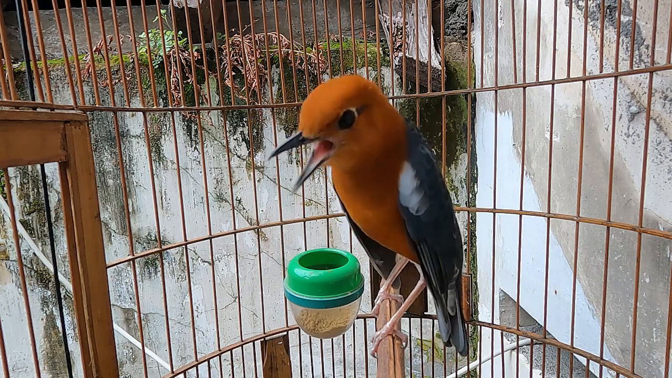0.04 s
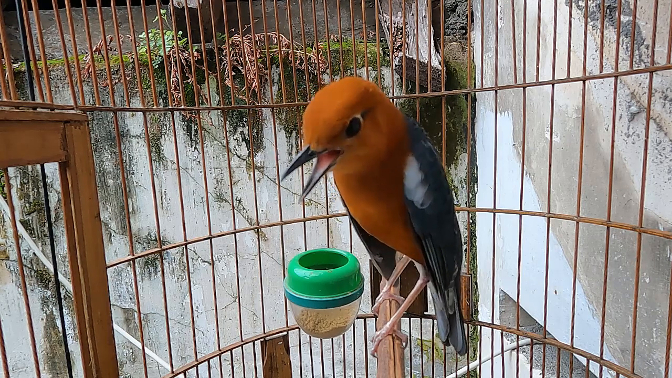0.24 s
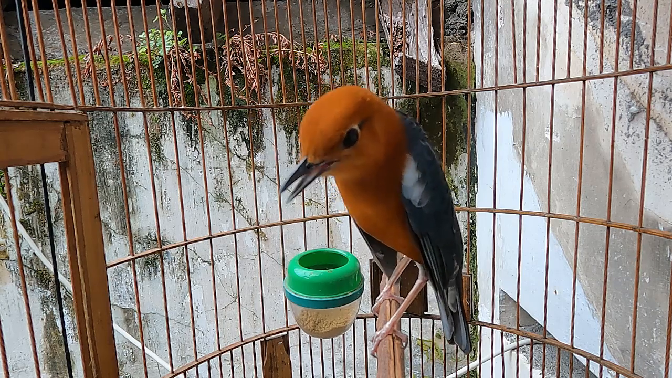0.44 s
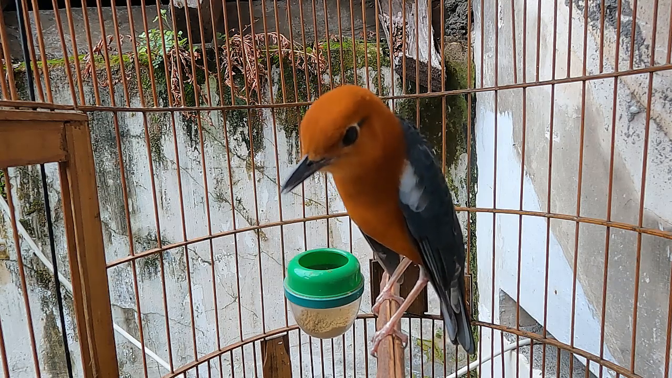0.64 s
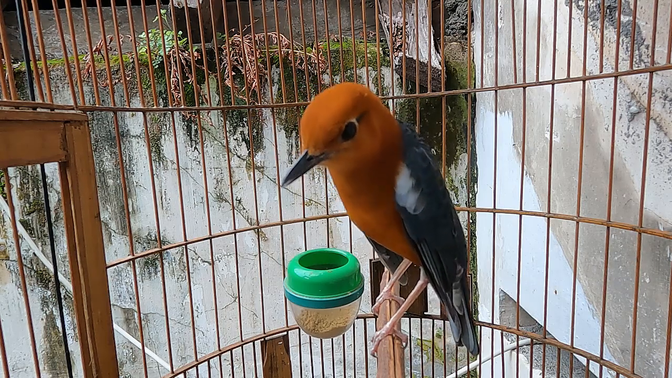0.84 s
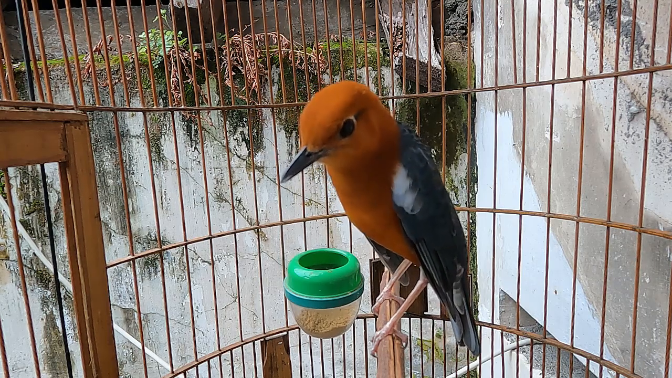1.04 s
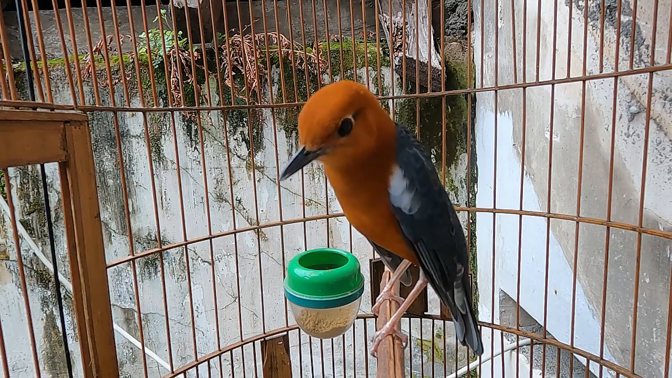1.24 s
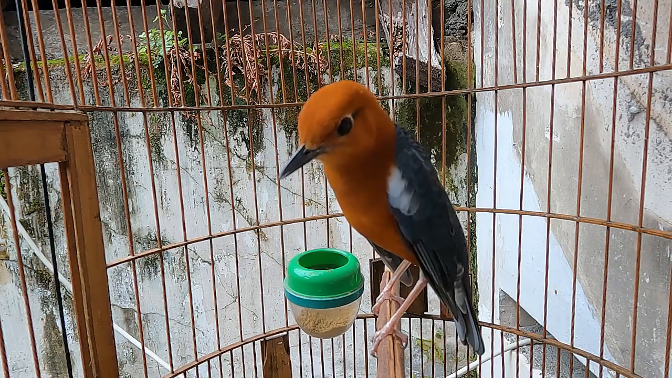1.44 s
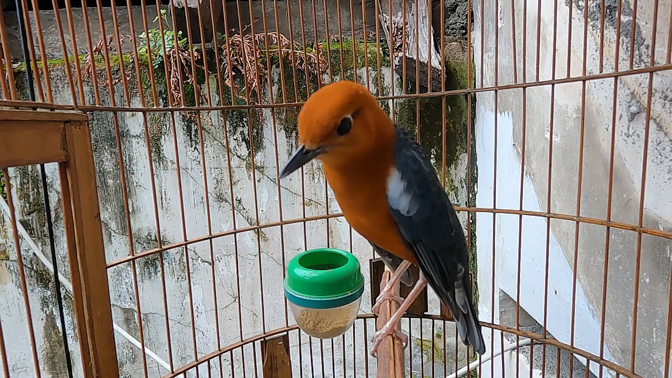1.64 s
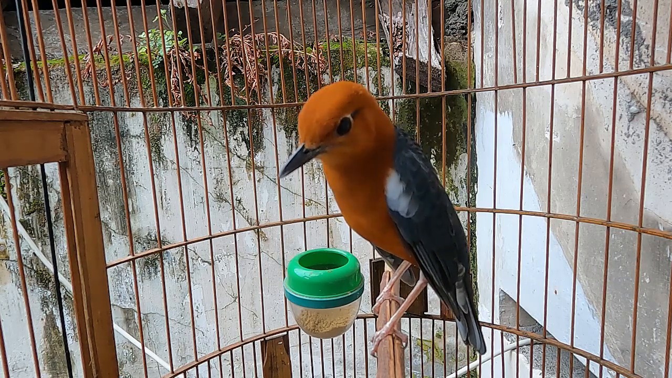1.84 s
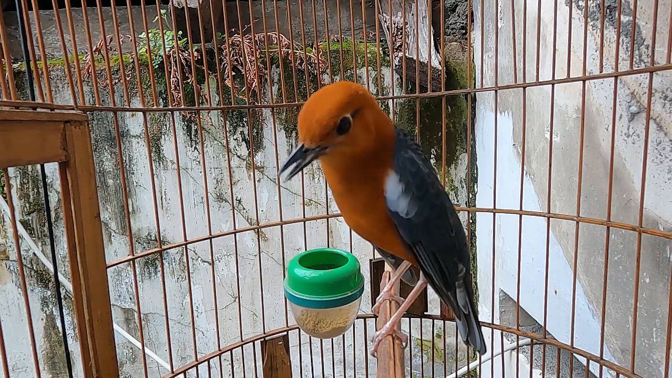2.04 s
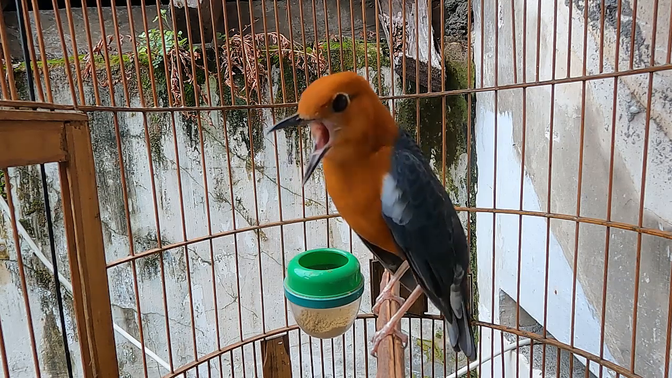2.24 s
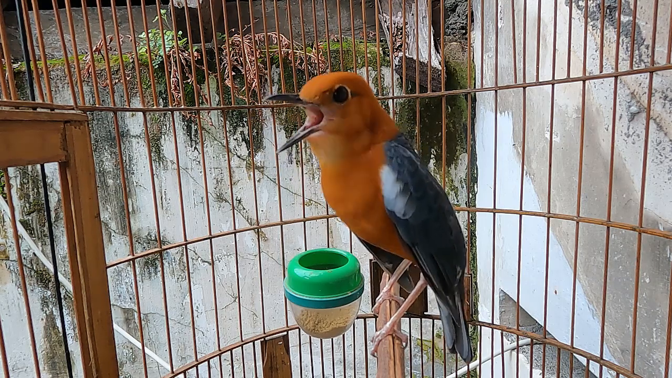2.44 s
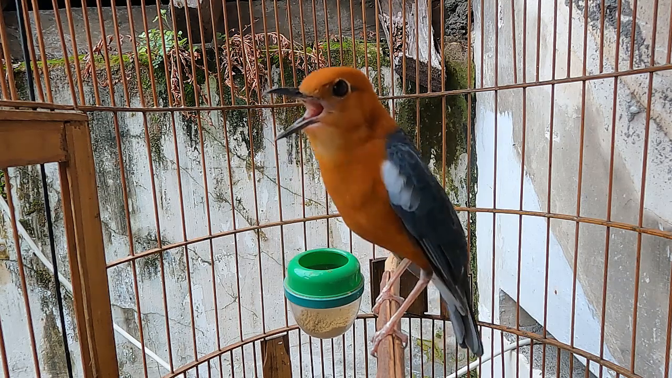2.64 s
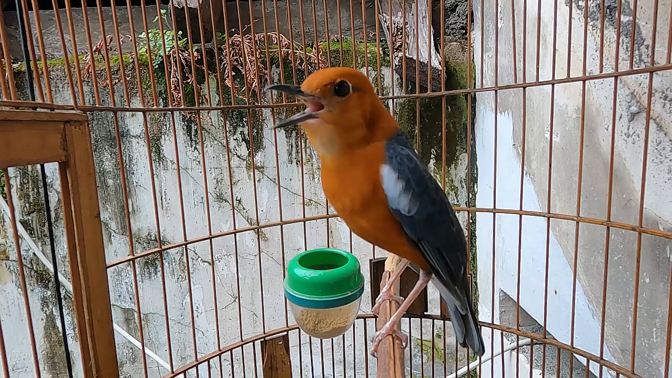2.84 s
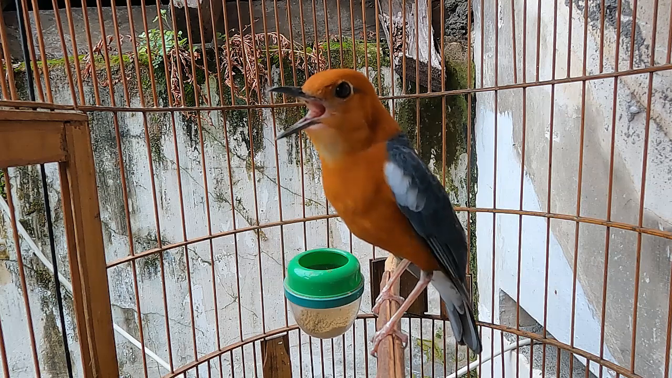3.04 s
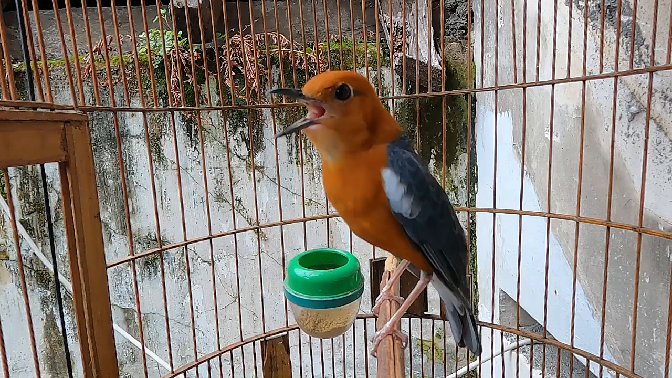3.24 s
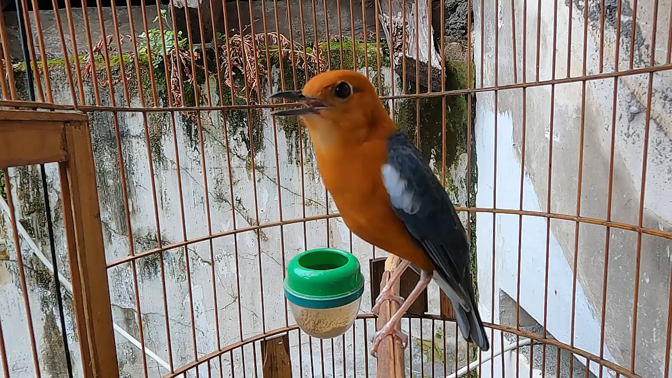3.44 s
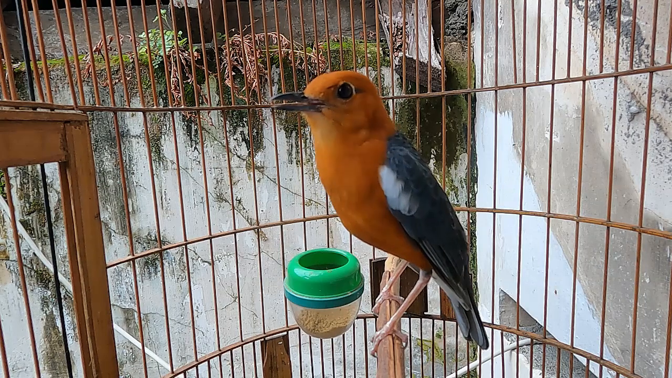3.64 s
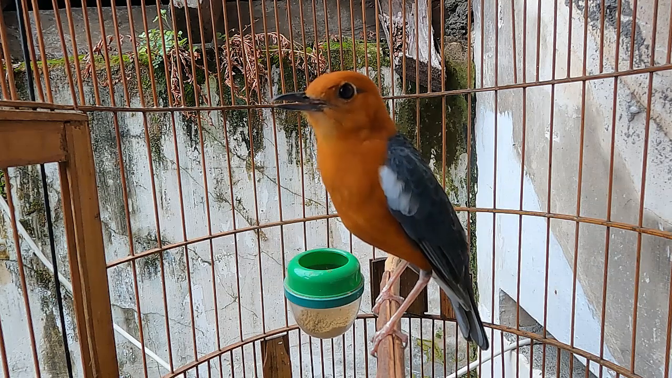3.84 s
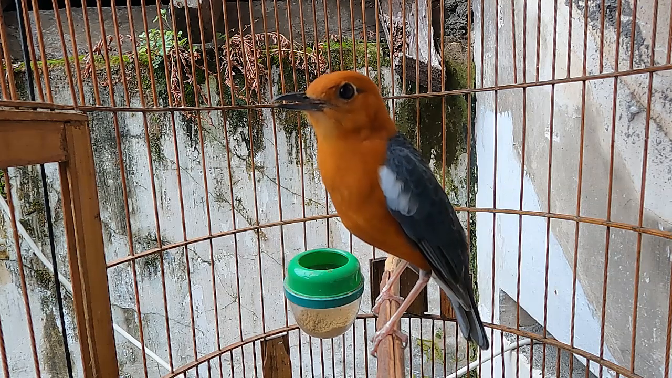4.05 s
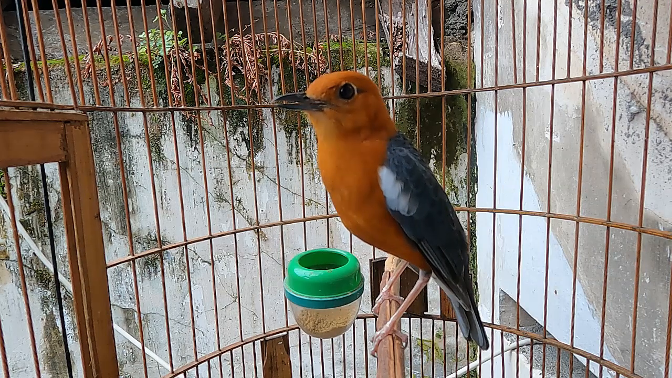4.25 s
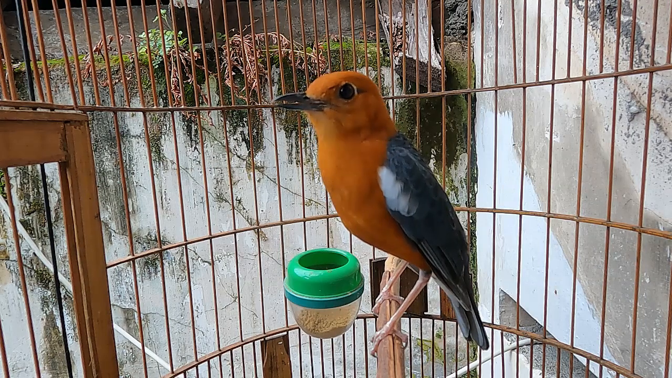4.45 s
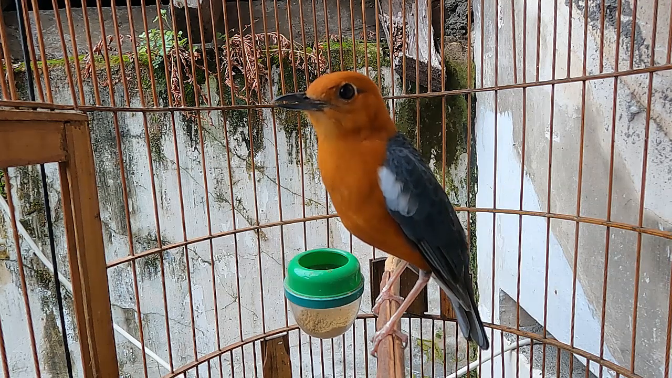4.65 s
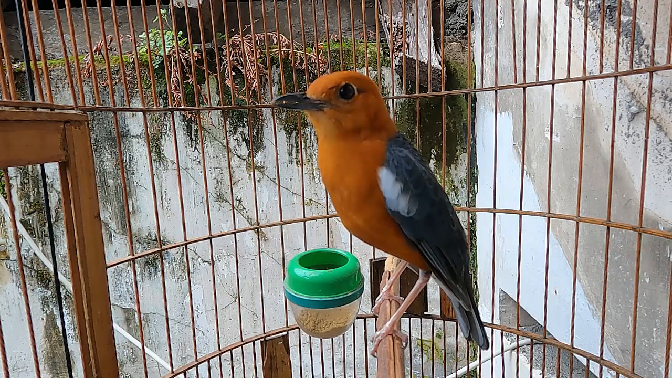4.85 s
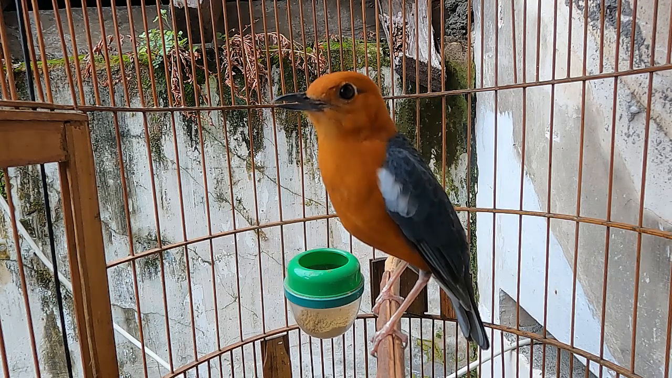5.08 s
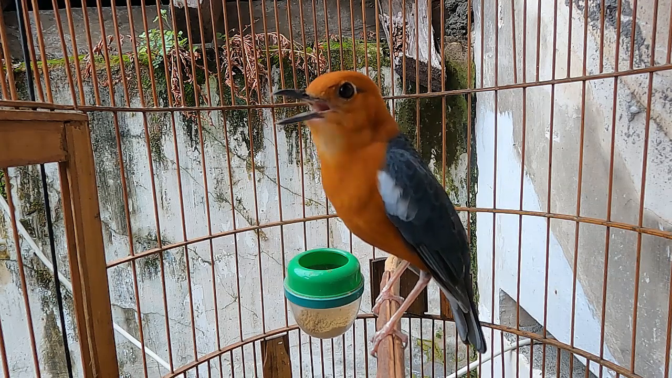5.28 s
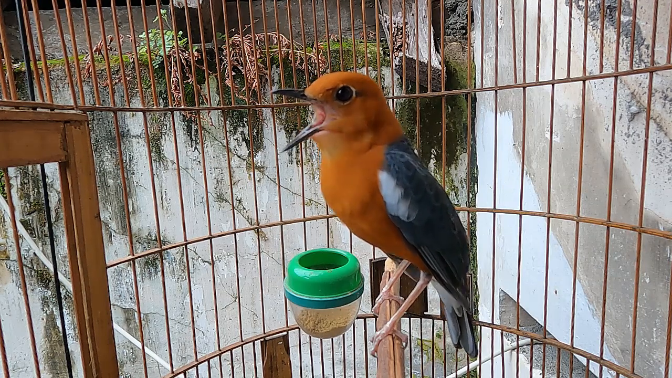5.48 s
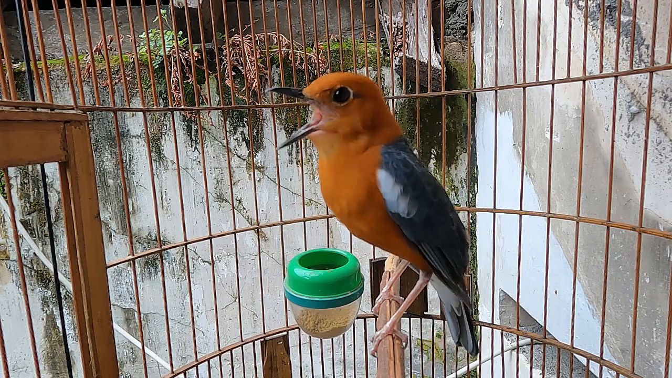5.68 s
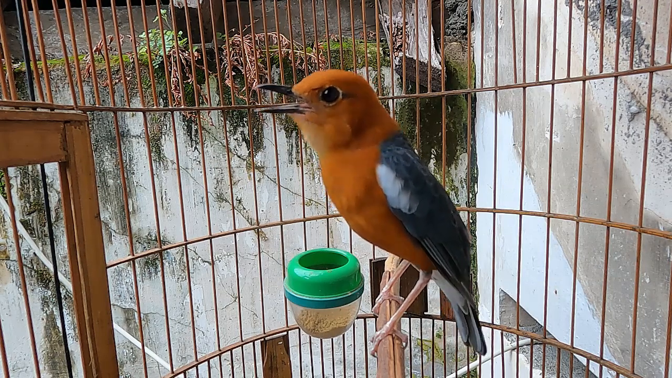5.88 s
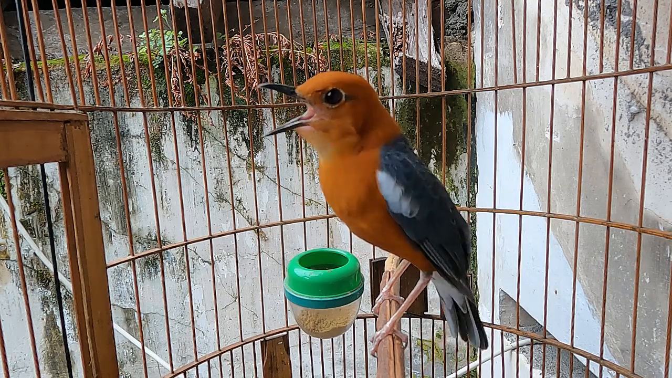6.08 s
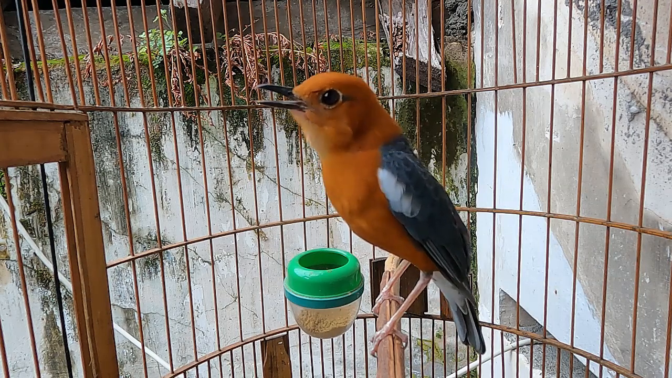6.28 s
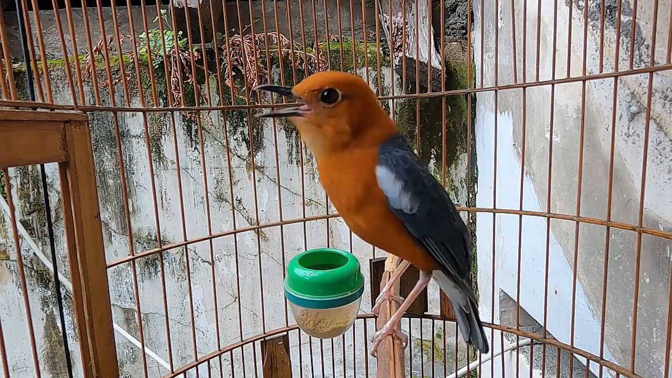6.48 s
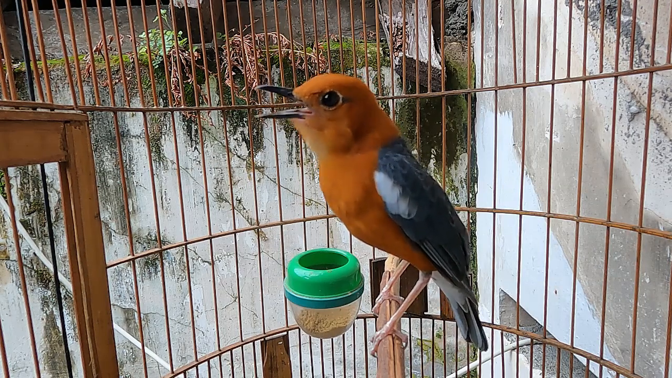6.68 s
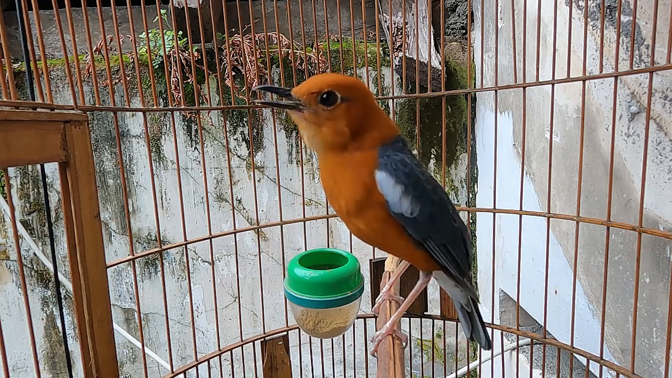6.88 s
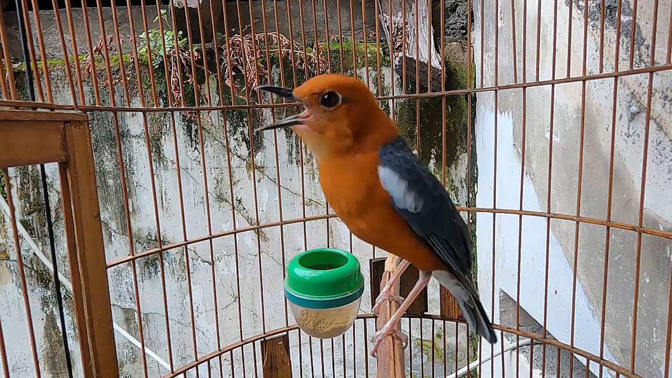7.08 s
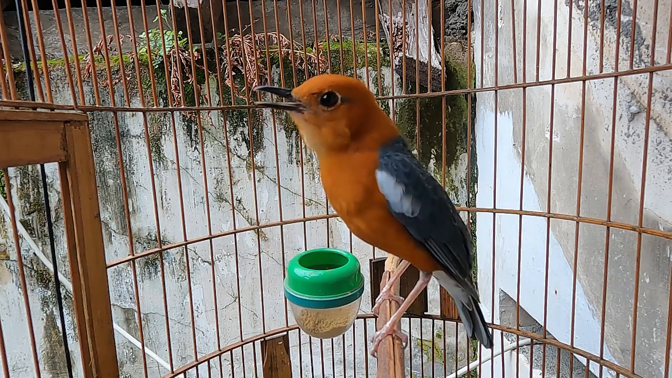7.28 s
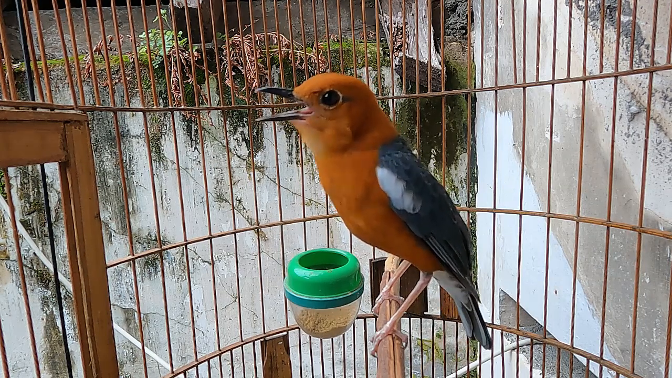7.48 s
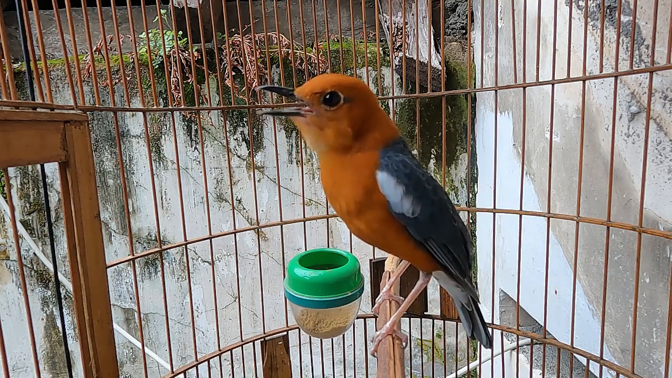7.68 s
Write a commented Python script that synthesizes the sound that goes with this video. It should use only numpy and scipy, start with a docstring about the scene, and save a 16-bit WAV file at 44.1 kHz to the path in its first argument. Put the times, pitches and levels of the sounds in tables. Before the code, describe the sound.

A caged thrush gives five harsh chips, then loud clear slurred whistles in two phrases, over low engine drone in a walled yard.

```python
"""A caged thrush sings close to the microphone in a walled yard, over engine drone and traffic noise.
First come five harsh chips, each two gliding voices that modulate each other, with turbulence added.
Faint hoarse two-partial calls and a soft noise rustle follow, then a phrase of near-sine slurred whistles.
After a pause with more far calls comes a second phrase of whistles, which runs to the end.
Delayed copies and a decaying tail form the yard; the loudest notes make the recorder turn its gain down."""
import sys
import numpy as np
from scipy import signal
from scipy.fft import rfft, irfft, next_fast_len
from scipy.io import wavfile
from scipy.ndimage import uniform_filter1d, minimum_filter1d

SR = 44100
rng = np.random.default_rng(int(sys.argv[2]) if len(sys.argv) > 2 else 0)


def store_pcm(level_fs):
    """Save levels as 16-bit WAV."""
    pcm = np.round(np.clip(level_fs, -1, 1) * 32767).astype(np.int16)
    wavfile.write(sys.argv[1], SR, np.atleast_2d(pcm).T)


N = 340452
TIME = np.arange(N) / SR
HZ = np.fft.rfftfreq(next_fast_len(N), 1 / SR)

# harsh two-voiced chips: start_s, length_s, level_db, lower_voice_factor, upper_voice_factor, trill_hz, rasp_db
CHIPS = [(0.032, 0.041, -12.5, 0.93, 1.16, 206, -12), (0.127, 0.032, -11, 0.97, 0.97, 173, -15.5),
         (0.21, 0.04, -14, 1.02, 1.006, 171, -15), (0.307, 0.033, -12, 1.064, .97, 170, -13.5),
         (0.42, 0.038, -16, 0.98, 0.98, 171.5, -8.5)]
# relative spectrum of turbulent breath: frequency_hz, level_db
RASP = [(1000, -27.5), (2200, -10.5), (3300, 11.5), (5500, 0.5), (8000, -12), (11000, -16.5), (15000, -27)]
# short arched notes in quick runs: start_s, length_s, top_pitch_hz, overtones_db (re level), level_db,
#   catch_db (re level)
TRILLS = [ (2.492, .054, 2777, -31, -1.5, -35.5), (2.547, .061, 2714, -28.5, -4, -34),
          (2.61, 0.039, 2662, -29, -2, -31.5), (2.652, 0.052, 2638, -27.5, -5.5, -16.5),
          (5.487, 0.061, 2769, -31, 4, -39.5), (5.562, .070, 2958, -26, 2.5, -20.5),
          (5.64, .079, 3033, -22.5, 1, -13), (5.725, 0.082, 2945, -26.5, 3.5, -19)]
# rising whistles with a late pitch flick: start_s, length_s, first_pitch_hz, last_pitch_hz, upward_bow_hz,
#   scoop (share of pitch), flick_hz, swell_db (over the note), overtones_db (re level), level_db,
#   catch_db (re level)
RISES = [ (2.772, 0.12, 2390, 2812, 222, .24, 4.5, 4, -28.5, -3.5, -24.5),
         (3.076, 0.07, 2436, 2907, 49.5, 0.11, 51, -0.5, -39.5, 3, -33.5),
         (3.339, .081, 2410, 2880, 71.5, .14, 26, -1, -39.5, 2.5, -44.5),
         (6.135, 0.083, 2643, 2936, -29.5, -.05, 92, 1, -45.5, 4.5, -44),
         (6.452, 0.063, 2349, 2743, 0, .18, 161.5, -1.5, -41, 4, -46),
         (6.75, 0.11, 2160, 2603, 12, 0.2, 106.5, -0.5, -37, -0.5, -30),
         (7.085, 0.1, 2160, 2590, 9.5, 0.19, 107.5, 2, -37, -1.5, -32),
         (7.446, .104, 2200, 2555, -29, .14, 112, 4.5, -36, -2.5, -25)]
# level or sinking whistles: start_s, length_s, first_pitch_hz, last_pitch_hz, scoop (share of pitch), hook_hz,
#   final_drop (share of pitch), attack_s, swell_db (over the note), overtones_db (re level), level_db,
#   catch_db (re level)
SINKS = [ (2.934, 0.082, 2456, 2347, 0.19, 52.5, 0.1, 0.01, 0, -39.5, 3, -37.5),
         (3.201, 0.084, 2370, 2147, 0.22, 68.5, 0.065, 0.0053, 2.5, -35, -1, -35.5),
         (5.372, 0.093, 2507, 2390, 0.26, 7.5, 0.072, 0.0028, 2.5, -38.5, 6.5, -30),
         (5.809, 0.1, 2092, 1807, -.03, 3, 0.24, 0.0064, 10, -29, -5, -26),
         (5.991, 0.051, 2130, 2203, 0.19, -6.5, 0.026, 0.008, 4.5, -35, 5.5, -36),
         (6.052, 0.041, 2189, 2176, .06, 20, 0.049, 0.0022, -2, -42, 1.5, -45),
         (6.092, .030, 2268, 2190, -0.01, 7.5, 0.068, 0.0023, -5.5, -31.5, -6, -43),
         (6.293, .122, 2044, 1945, 0.23, 30, 0.09, 0.016, -5.5, -30, -1, -37),
         (6.596, 0.13, 1986, 1836, .18, 63.5, 0.026, 0.0033, 8, -27, -8.5, -35),
         (6.943, .127, 1883, 1843, 0.17, 148, 0.088, 0.0079, 5, -26, -8, -36),
         (7.287, 0.15, 1755, 1816, 0.079, 174, .04, 0.013, -5.5, -27, -9, -31),
         (7.648, 0.15, 1825, 1759, 0.15, 65, .05, 0.015, -8, -26.5, -10, -33)]

# whistle edges: time constants of the scoop into pitch, the final pitch sag and the final level drop
SCOOP_S, SAG_S, DROP_S = 0.0055, 0.008, 0.005
ENDS_DB = -27  # level change at the ends of a note
OVERTONE_HOLD = 0.68  # share of a note's swell and fade that its overtones do not follow


def amp(db):
    """Level definition: 20 dB is a tenfold amplitude."""
    return 10 ** (np.asarray(db) / 20)


def evened(x):
    """Power normalization: scales to rms 1."""
    return x / np.sqrt(np.mean(x ** 2) + 1e-20)


def read(points, hz):
    """Spectral interpolation on a log-frequency axis."""
    point_hz, value = np.transpose(points)
    return np.interp(np.log(hz + 1), np.log(point_hz + 1), value)


def curve(rows, t):
    """Linear interpolation of every column of a curve at the times t."""
    s, *columns = np.transpose(rows)
    return [np.interp(t, s, column) for column in columns]


def add(mix, s, sound):
    """Superposition: mixes a sound in at time s."""
    part = mix[max(round(s * SR), 0):][:len(sound)]
    part += sound[:len(part)]


def shaped(x, gain):
    """Linear filtering: multiplies the spectrum by a gain given on the axis HZ."""
    size = next_fast_len(N)
    return irfft(rfft(x, size) * gain, size)[:N]


def noise(spectrum):
    """Coloured noise: white noise through a spectral filter, at rms 1."""
    return evened(shaped(rng.standard_normal(N), amp(read(spectrum, HZ))))


def wander(hz, size):
    """Random modulation: low-passed noise of rms 1, up to about hz changes a second."""
    return evened(shaped(rng.standard_normal(N), 1 / (1 + (HZ / hz) ** 4))[:size])


def street(wash_db=-49):
    """Broadband traffic noise, split by filtering into a low rumble and a dull wash that swell and sink."""
    # relative spectral density: frequency_hz, level_db (per Hz)
    spectrum = [(20, -26.5), (27, -17.5), (45, -13), (70, -6), (100, -5), (130, -9.5), (190, -17.5),
                (260, -23), (370, -29.5), (500, -35.5), (830, -39.5), (1500, -46), (2000, -52),
                (4500, -59.5), (6500, -70.5), (9000, -75.5), (12000, -94.5)]
    # rumble level: time_s, level_db
    rumble_db = [(0, -41), (.6, -47.5), (2.2, -47), (3, -41), (4.2, -41), (5.1, -38), (6.2, -40.5),
                 (7.1, -35), (7.72, -36)]
    traffic = noise(spectrum)
    low = 1 / (1 + (HZ / 260) ** 8)
    # each part is scaled by the strength of a reference band
    rumble = shaped(traffic, low) / shaped(traffic, (HZ > 110) * (HZ < 260)).std()
    wash = shaped(traffic, 1 - low) / shaped(traffic, (HZ > 260) * (HZ < 1200)).std()
    wash_gain = amp(wash_db + 1.1 * wander(5.5, N))
    return rumble * amp(curve(rumble_db, TIME)[0]) + wash * wash_gain


def engines(near_db=-1.0, unsteady=0.012, throb_db=4.0):
    """Harmonic exhaust orders follow one engine's changing firing rate; a second engine holds its partials."""
    # nearer engine, before its slight unsteadiness: time_s, firing_rate_hz
    firing = [(0, 30.8), (.7, 29.7), (1.8, 29.7), (2.1, 32.5), (2.45, 32.1), (2.8, 28.4), (3.4, 27.6),
              (3.9, 29.3), (4.7, 29.7), (5.2, 31.3), (6.1, 31.5), (6.8, 29.8), (7.4, 28), (7.72, 27.9)]
    # nearer engine's level, before the trim near_db: time_s, level_db
    near_level = [(0, -22.5), (.6, -38), (2.1, -29.5), (2.9, -30), (3.35, -38), (3.9, -26.5), (5.0, -34.5),
                  (5.4, -25), (6.1, -28), (6.8, -41.5), (7.6, -26.5)]
    # relative exhaust orders: multiple of the firing rate, level_db
    exhaust = [(2, -14.5), (3, 4), (4, -8), (5, -11), (6, -16.5), (7, -25.5)]
    # relative partials of the steady engine: frequency_hz, level_db
    drone = [(22.6, -11.5), (45, -11.5), (74.6, -3), (82, 5.5), (134, -14), (149, -17.5), (197, -21)]
    # steady engine's level: time_s, level_db
    drone_level = [(0, -37), (1.9, -33), (2.8, -40), (5, -40), (6.2, -50), (7.72, -32.5)]

    turns = np.cumsum(curve(firing, TIME)[0] * (1 + unsteady * wander(6, N))) / SR
    near = np.zeros(N)
    for order, db in exhaust:
        phase = 2 * np.pi * (round(order) * turns + rng.random())
        near += amp(db + throb_db * wander(2.8, N)) * np.sin(phase)

    clock = np.cumsum(1 + 0.0067 * wander(4, N)) / SR
    steady = np.zeros(N)
    for hz, db in drone:
        steady += amp(db) * np.sin(2 * np.pi * (hz * clock + rng.random()))

    near_gain = amp(curve(near_level, TIME)[0] + near_db)
    return evened(near) * near_gain + evened(steady) * amp(curve(drone_level, TIME)[0])


def far_calls():
    """Frequency modulation by noise makes far two-partial calls hoarse."""
    # calls, levels before the yard: start_s, length_s, first_pitch_hz, last_pitch_hz, fundamental_db, octave_db,
    #   hoarseness (share of pitch)
    calls = [(0.719, .21, 797, 842, -57.5, -59.5, 0.053), (1.112, 0.16, 732, 748, -63, -59, 0.038),
             (1.147, 0.13, 7830, 8150, -69.5, -110, 0.015), (1.646, 0.19, 747, 776, -58, -56.5, 0.055),
             (2.15, .14, 798, 802, -58, -57, 0.055), (4.48, 0.051, 1450, 1418, -48.5, -71, 0.033),
             (4.479, 0.48, 938, 865, -58, -58.5, 0.054), (4.49, 0.093, 1130, 1146, -69, -65, 0.036),
             (5.756, 0.1, 793, 843, -48, -68, 0.058)]
    out, waver = np.zeros(N), wander(150, N)
    for s, length, hz, end_hz, db, octave_db, hoarse in calls:
        at = round(s * SR) + np.arange(round(length * SR))
        pitch = np.linspace(hz, end_hz, len(at)) * (1 + hoarse * waver[at])
        phase = 2 * np.pi * np.cumsum(pitch) / SR
        call = amp(db) * np.sin(phase) + amp(octave_db) * np.sin(2 * phase)
        add(out, s, call * signal.windows.tukey(len(at), 0.6))
    return out


def yard(x, build_s=0.013, early_db=5, early_s=0.082):
    """Diffuse reverberation: convolution with sparse random taps, each band decaying at its own speed."""
    # late decay: frequency_hz, t60_s
    decay = [(1500, 0.36), (2800, 0.41), (4500, 0.23), (6000, 0.36), (9000, .28), (14000, 0.28)]
    t = np.arange(SR) / SR
    taps = rng.choice([-1., 1.], SR) * (rng.random(SR) < 0.1)
    taps *= (1 - np.exp(-t / build_s)) * (1 + amp(early_db) * np.exp(-t / early_s))
    hz, s, bands = signal.stft(taps, SR, nperseg=256)
    bands = bands * amp(-60 * s / read(decay, hz)[:, None])
    tail = signal.istft(bands, SR, nperseg=256)[1]
    return signal.fftconvolve(x, tail / np.linalg.norm(tail))[:N]


def echoes(x):
    """Specular reflection: the floor and nearest walls return delayed, weaker copies."""
    # relative reflections: delay_s, level_db
    walls = [(.0031, -20), (.0074, -21), (0.013, -21.5), (0.0188, -22.5), (.027, -27), (0.037, -28.5)]
    out = np.zeros(N)
    for delay, db in walls:
        add(out, delay, amp(db) * x)
    return out


def rustle(level_db=-68):
    """Friction noise under a smooth swell as the bird shifts on its perch."""
    swell = np.exp(-((TIME - 1.985) / 0.028) ** 2)
    return amp(level_db) * noise([(1500, -13), (5000, 8), (9000, -1), (13000, -21)]) * swell


def catches(opening_s=2.299, opening_db=-26, chip_db=-16, chip_lead_s=0.0015):
    """Turbulence for a few milliseconds before the membranes lock onto a pitch, or after they let go."""
    centre_hz, width_s, lag_s = 3255, 0.0029, 0.00076  # width is the 1/e half width of a burst
    let_go_db = -38  # relative to the note's level
    out, rasp = np.zeros(N), noise(RASP)
    hiss = wander(410, N) + 1j * wander(1000, N)
    bursts = [(opening_s, opening_db)]
    for s, _, db, *_ in CHIPS:
        bursts.append((s - chip_lead_s, db + chip_db))
    for s, length, *_, db, catch_db in TRILLS + RISES + SINKS:
        bursts.append((s + lag_s, db + catch_db))
        bursts.append((s + length - lag_s, db + let_go_db))
    t = np.arange(-1200, 1200) / SR
    for s, db in bursts:
        add(out, s + t[0], amp(db) * np.exp(-(t / width_s) ** 2))
    narrow = (hiss * np.exp(2j * np.pi * centre_hz * TIME)).real
    return out * (narrow + 0.15 * rasp)


def chips(mixing_db=-18):
    """Nonlinear coupling: both sides of the syrinx sweep an arch, trill as they fall and modulate each other."""
    # arch of every chip, before its voice factors: share of length, lower_voice_hz, upper_voice_hz,
    #   lower_voice_db, upper_voice_db
    arch = [(0, 1850, 3518, -22.5, -15), (.13, 2559, 4034, -9.5, -1.5), (.33, 3769, 5770, -2.5, -4),
            (.55, 3524, 4840, -1.5, -7), (.72, 3464, 4303, -2, -1.5), (.87, 3030, 3743, -6.5, -5),
            (1, 2270, 3093, -19, -18)]
    out, rasp = np.zeros(N), noise(RASP)
    drift = np.array([0.01 * wander(700, N) + 0.022 * wander(110, N) for voice in range(2)])
    flutter_db = np.array([2.5 * wander(250, N) for voice in range(2)])
    for s, length, level_db, lower, upper, trill_hz, rasp_db in CHIPS:
        at = round(s * SR) + np.arange(round(length * SR))
        u = np.linspace(0, 1, len(at))
        low_hz, high_hz, low_db, high_db = curve(arch, u)
        falling = np.maximum(u - 0.33, 0)
        trill_depth = 0.08 * np.minimum(falling / 0.08, 1)
        quiver = trill_depth * np.cos(2 * np.pi * trill_hz * falling * length)
        hz = np.array([lower * low_hz, upper * high_hz]) * (1 + quiver + drift[:, at])
        level = amp(np.array([low_db, high_db]) + flutter_db[:, at])
        low, high = level * np.exp(2j * np.pi * np.cumsum(hz, 1) / SR)
        # products of the voices give their sum tone and octaves
        mixing = low * high + low ** 2 + 0.5 * high ** 2
        voices = (low + high + amp(mixing_db) * mixing).imag
        chip = voices + amp(rasp_db) * np.sqrt(abs(low) + abs(high)) * rasp[at]
        add(out, s, amp(level_db) * chip * signal.windows.tukey(len(at), 0.14))
    return out


def span(start, length):
    """Discrete time: sample numbers of a note, and its own time in seconds."""
    at = np.arange(round(start * SR), min(round((start + length) * SR), N))
    return at, (at - at[0]) / SR


def opening():
    """Continuous frequency glide: a long sinking whistle opens the first phrase."""
    # breakpoints, smoothed below: time_s, pitch_hz, level_db, overtones_db (re level)
    glide = [(2.268, 3540, -48, -21), (2.296, 3520, -27, -18), (2.305, 3560, 3, -25),
             (2.365, 3558, 4, -28.5), (2.385, 3282, 0.5, -20), (2.412, 3081, 3, -33.5),
             (2.44, 2967, -12.5, -33), (2.472, 2878, 3.5, -33), (2.488, 2590, -20.5, -41.5)]
    at, _ = span(glide[0][0], glide[-1][0] - glide[0][0])
    return at, *uniform_filter1d(curve(glide, at / SR), size=180, mode="nearest")


def trill(start, length, top_hz, over_db, level_db):
    """Coupled frequency and amplitude: pitch and level rise and fall in one round arch."""
    arch_per_s, arch_power = 3.5, 3.8  # a longer note starts and ends further below its top
    voiced, fade_power = 0.94, 5.5  # share of the note inside the fade, and how squarely it fades
    at, t = span(start, length)
    off_top = abs(2 * t / length - 1)
    hz = top_hz * (1 - arch_per_s * length * off_top ** arch_power)
    shape_db = ENDS_DB * np.minimum(off_top / voiced, 1) ** fade_power
    return at, hz, level_db + shape_db, over_db - OVERTONE_HOLD * shape_db


def rise(start, length, first_hz, last_hz, bow_hz, scoop, flick_hz, swell_db, over_db, level_db):
    """Frequency glide and vibrato: the voice scoops in, climbs a bowed line, flicks and drops away."""
    attack_s, final_drop = 0.0059, 0.22  # the drop is a share of the pitch
    flick_lead_s, flick_s = 0.015, 0.007  # the flick's time before the end, and its width
    quaver_hz, quaver_depth_hz = 126.34, 106  # rate, and the depth reached at the end of the climb
    at, t = span(start, length)
    u, leaving = t / length, np.exp((t - length) / DROP_S)
    hz = first_hz + (last_hz - first_hz) * u + bow_hz * (1 - (2 * u - 1) ** 2)
    hz += quaver_depth_hz * u ** 3 * np.sin(2 * np.pi * (quaver_hz * t + rng.random()))
    hz += flick_hz * np.exp(-((length - t - flick_lead_s) / flick_s) ** 2)
    hz *= 1 - scoop * np.exp(-t / SCOOP_S) - final_drop * leaving
    shape_db = swell_db * (u - 0.5) + ENDS_DB * (np.exp(-t / attack_s) + leaving)
    return at, hz, level_db + shape_db, over_db - OVERTONE_HOLD * shape_db


def sink(start, length, first_hz, last_hz, scoop, hook_hz, drop, attack_s, swell_db, over_db, level_db):
    """Frequency glide with a transient: the voice scoops in, hooks, settles on a line and drops away."""
    hook_at_s, hook_s = 0.018, 0.0051  # the hook's time after the start, and its width
    at, t = span(start, length)
    u, leaving = t / length, np.exp((t - length) / DROP_S)
    hz = first_hz + (last_hz - first_hz) * u
    hz += hook_hz * np.exp(-((t - hook_at_s) / hook_s) ** 2)
    hz *= 1 - scoop * np.exp(-t / SCOOP_S) - drop * np.exp((t - length) / SAG_S)
    shape_db = swell_db * (u - 0.5) + ENDS_DB * (np.exp(-t / attack_s) + leaving)
    return at, hz, level_db + shape_db, over_db - OVERTONE_HOLD * shape_db


def notes():
    """Pitch and level contours: samples, pitch, level and overtone level of every whistled note."""
    song = [opening()]
    for sing, table in [(trill, TRILLS), (rise, RISES), (sink, SINKS)]:
        song += [sing(*row[:-1]) for row in table]  # the last column belongs to catches()
    return song


def whistles(jitter=0.006, shimmer=0.011, unrest=0.012, air_db=-26, patchy_db=4.0):
    """Additive synthesis: the syrinx gives a near sine with weak overtones, rough where the pitch flicks."""
    # relative colour of the overtones leaving the beak: frequency_hz, level_db
    beak = [(3300, 12.5), (4000, -9.5), (4800, 1), (5900, -6.5), (6800, -3.5), (7800, 0), (9000, 0),
            (10000, -5), (11000, -30), (13000, -23), (15000, -30.5), (16500, -39)]
    # low notes, sung with the beak nearly shut, favour their octave
    octave_below_hz, octave_db_per_hz = 2250, 0.02
    out = np.zeros(N)
    waver, flutter, rough, air = wander(170, N), wander(210, N), wander(700, N), noise(RASP)
    drift = wander(40, N)
    multiples = np.arange(2, 9)[:, None]
    for at, hz, level_db, over_db in notes():
        # 0 on a steady pitch, 1 where it moves by 45 kHz a second or more
        flick = np.minimum(abs(np.gradient(hz)) * SR / 45000, 1) ** 2
        moving_hz = hz * (1 + jitter * waver[at] + unrest * flick * rough[at])
        phase = 2 * np.pi * np.cumsum(moving_hz) / SR

        colour = amp(read(beak, multiples * hz)) * (multiples * hz < SR / 2)
        colour[0] *= amp(octave_db_per_hz * np.maximum(octave_below_hz - hz, 0))
        colour /= np.linalg.norm(colour, axis=0)
        # each overtone's level wavers slowly and at random, independently of the others
        colour *= amp(patchy_db * drift[(at + rng.integers(0, N, multiples.shape)) % N])
        overtones = (1 - 0.5 * flick) * (colour * np.sin(multiples * phase)).sum(0)
        breath = (amp(air_db) + 0.27 * flick) * air[at]

        tone = amp(level_db) * np.sin(phase) * (1 + shimmer * flutter[at])
        tone += amp(level_db + over_db) * (overtones + breath)
        add(out, at[0] / SR, tone * signal.windows.tukey(len(at), 0.06))
    return out


def gain_control(x, size=64):
    """Feedback compression: loud notes turn the gain down quickly; in pauses it creeps back up."""
    start_gain_db, aim_db = 5, 1.5  # first gain, and the peak level above which it turns down
    duck_s, recover_db_per_s = 0.029, 4.5
    bass_lag_s = 0.13  # the bass follows the gain more slowly
    step_s = size / SR
    gain_db, bass_db, gains = start_gain_db, start_gain_db, []
    peaks = abs(x[:N // size * size]).reshape(-1, size).max(1)
    for peak_db in 20 * np.log10(peaks + 1e-9):
        excess_db = max(peak_db + gain_db - aim_db, 0)
        gain_db += step_s * (recover_db_per_s - excess_db / duck_s)
        bass_db += step_s * (gain_db - bass_db) / bass_lag_s
        gains.append((len(gains) * step_s, gain_db, bass_db))
    return amp(curve(gains, TIME))


def scene():
    """Superposition of direct sound, early echoes and reverberation, over the street."""
    # directivity: the beak beams the treble at the walls, past the microphone: frequency_hz, relative level_db
    beam_points = [(1500, 3), (2800, 2.5), (4000, -2.5), (5200, 4.5), (7000, 2), (9000, 3.5), (14000, -1)]
    song, harsh = whistles(), chips() + catches()
    beam = amp(read(beam_points, HZ))
    sent = shaped(amp(-21) * song, beam) + amp(-15.5) * harsh
    wet = yard(sent + amp(1.5) * far_calls())
    early = amp(2) * echoes(shaped(song, beam) + harsh)
    return (song + harsh + early + wet + engines() + street() + rustle())[None]


def record(dry, knee=0.93, image_db=-53, ceiling_db=0.25):
    """Recorder nonlinearity: faint treble mirror image, gain control, limiter, soft overload, band limit."""
    bass_hz, edge_hz = 205, 15900
    # multiplying by a 16 kHz carrier mirrors the song band below it
    mirror = 2 * np.cos(2 * np.pi * 16000 * TIME)
    band = signal.butter(4, [1500, 4000], "bandpass", fs=SR, output="sos")
    x = dry[0] + amp(image_db) * signal.sosfilt(band, dry[0]) * mirror

    gain, bass_gain = gain_control(x)
    bass = shaped(x, 1 / (1 + (HZ / bass_hz) ** 6))
    x = (x - bass) * gain

    # the limiter acts on all but the bass
    allowed = minimum_filter1d(np.minimum(amp(ceiling_db) / (abs(x) + 1e-9), 1), size=400)
    x = x * uniform_filter1d(allowed, size=400) + bass * bass_gain

    # above the knee the waveform bends smoothly toward 1
    linear = np.clip(x, -knee, knee)
    x = linear + (1 - knee) * np.tanh((x - linear) / (1 - knee))
    low_pass = signal.firwin(255, edge_hz, window=("kaiser", 7), fs=SR)
    return signal.oaconvolve(x, low_pass, "same")[None]


dry = scene()
out = record(dry)
store_pcm(out)
```